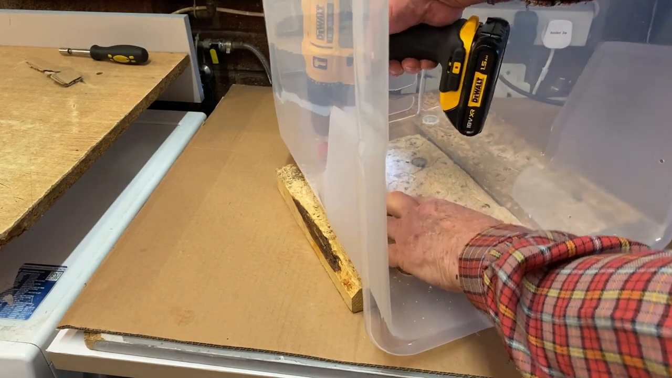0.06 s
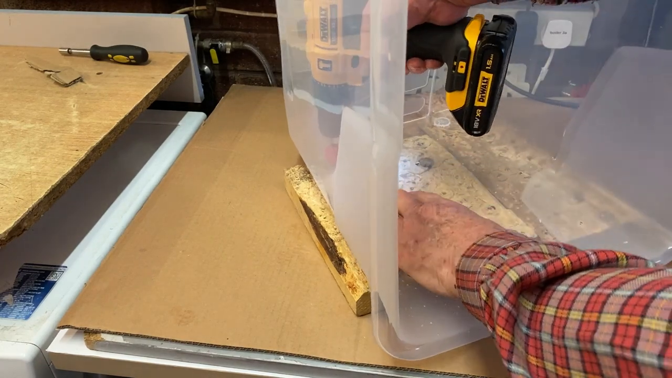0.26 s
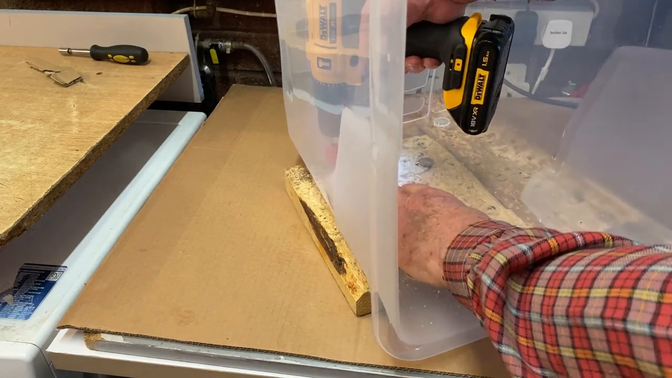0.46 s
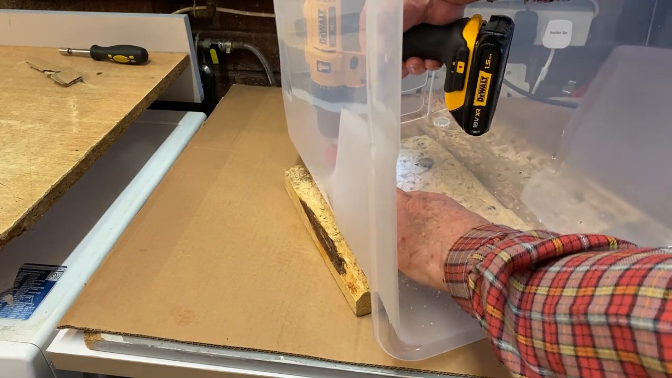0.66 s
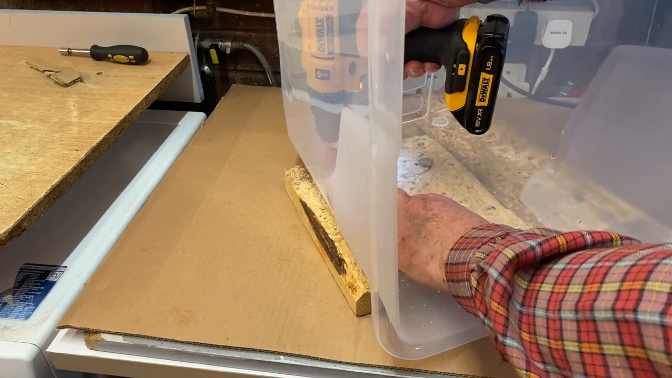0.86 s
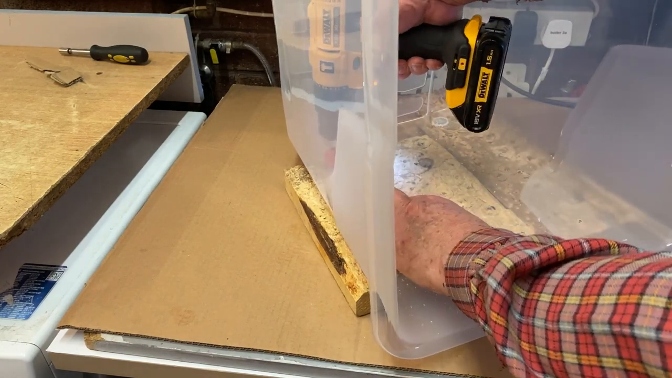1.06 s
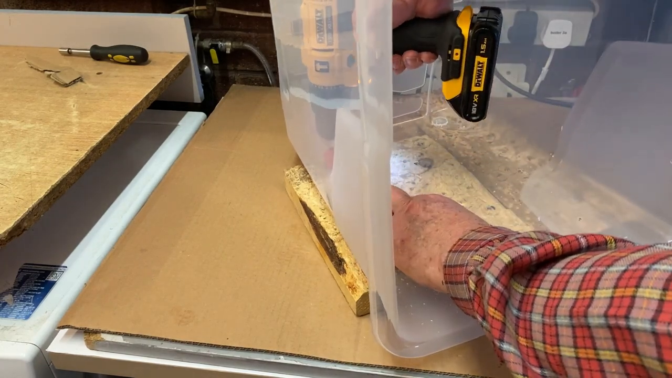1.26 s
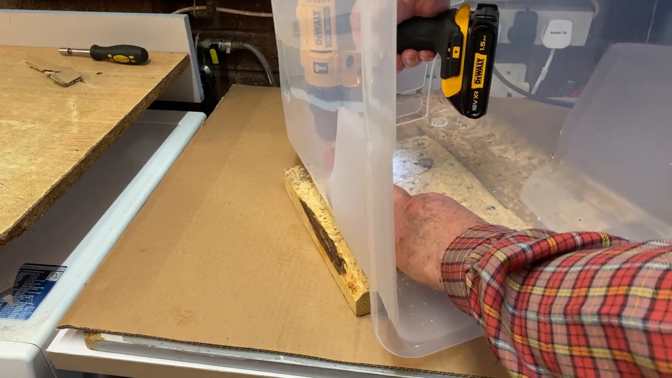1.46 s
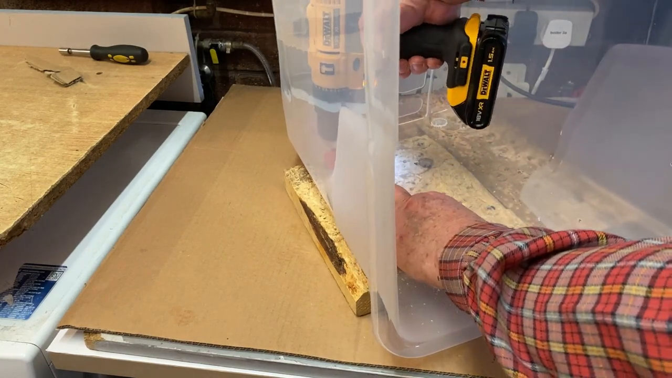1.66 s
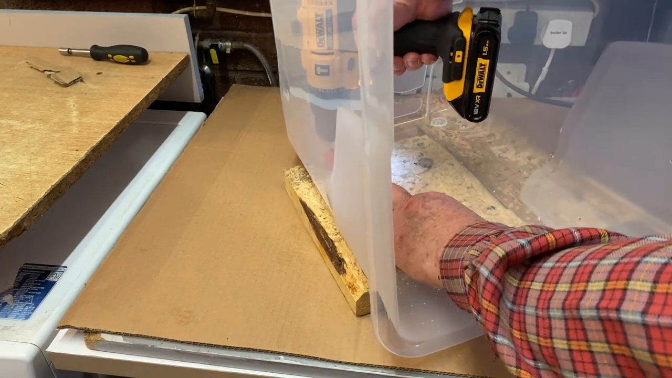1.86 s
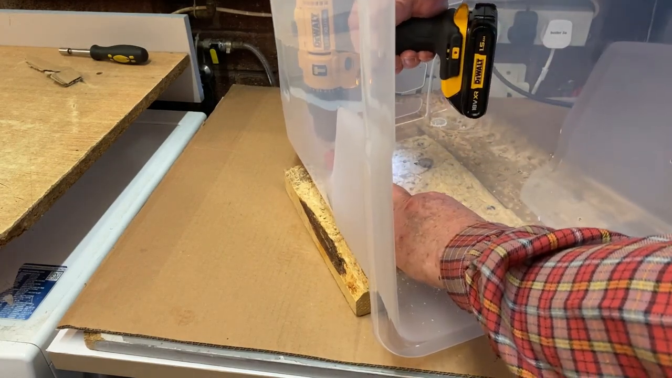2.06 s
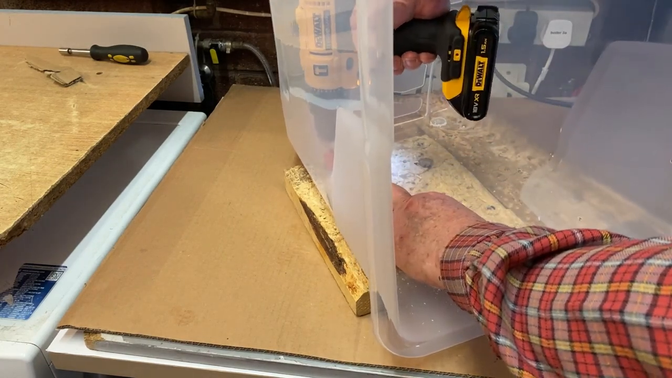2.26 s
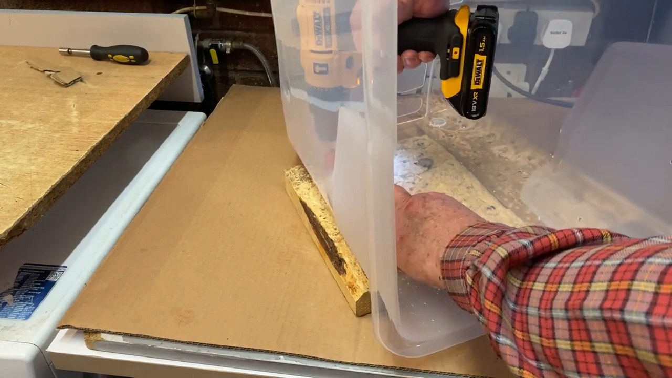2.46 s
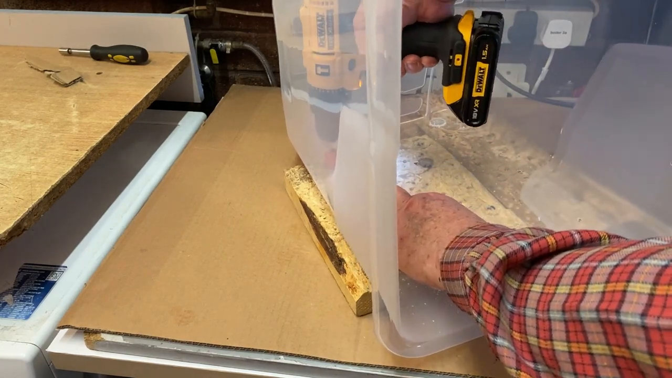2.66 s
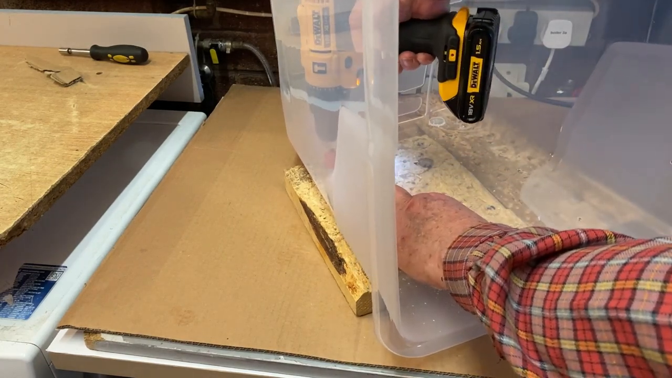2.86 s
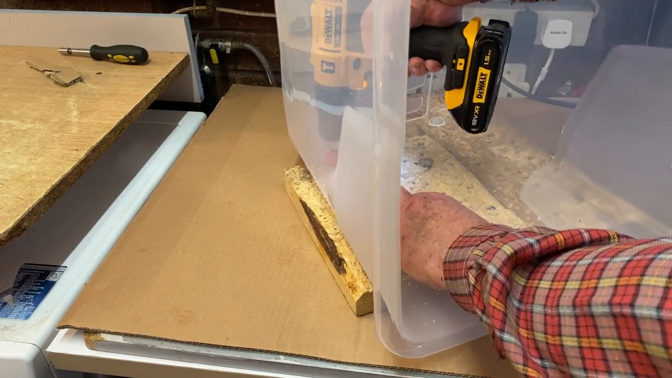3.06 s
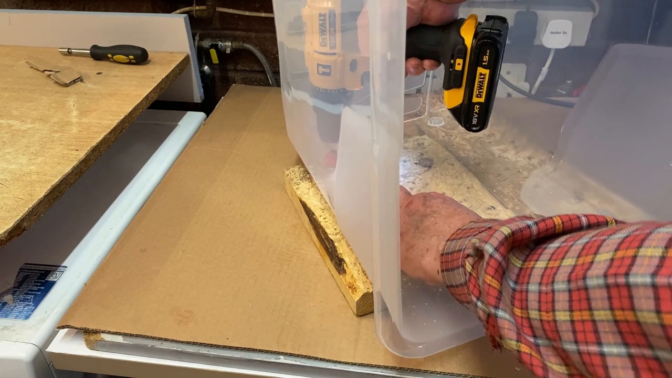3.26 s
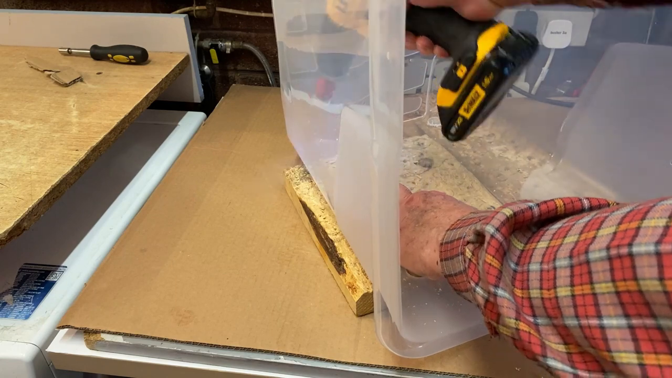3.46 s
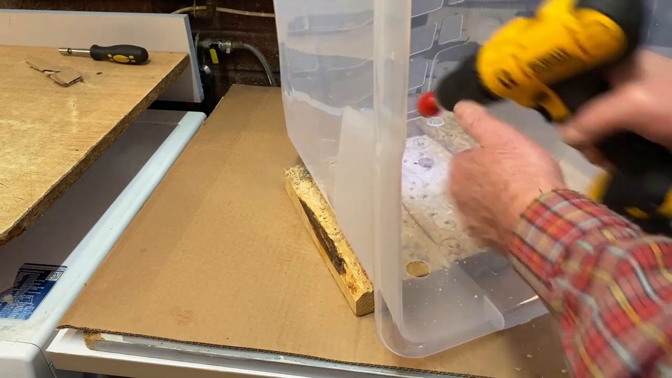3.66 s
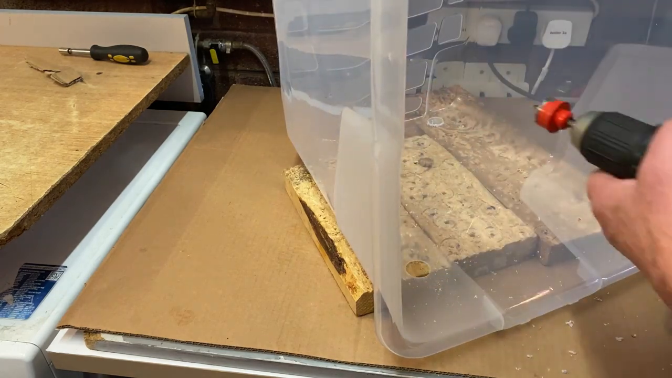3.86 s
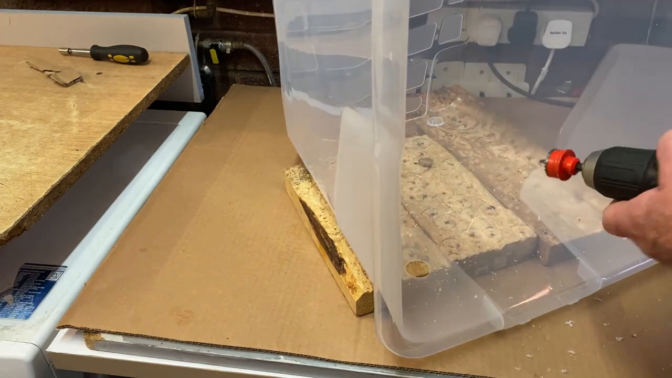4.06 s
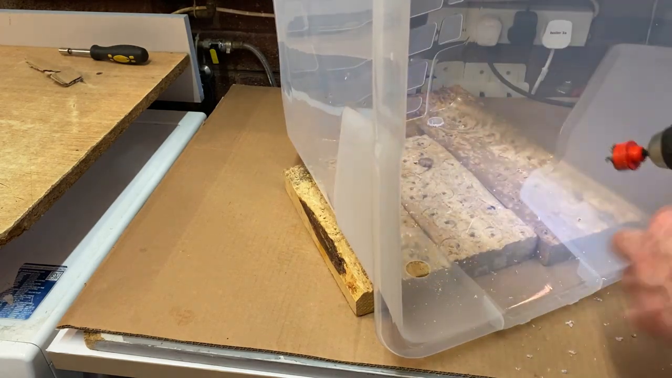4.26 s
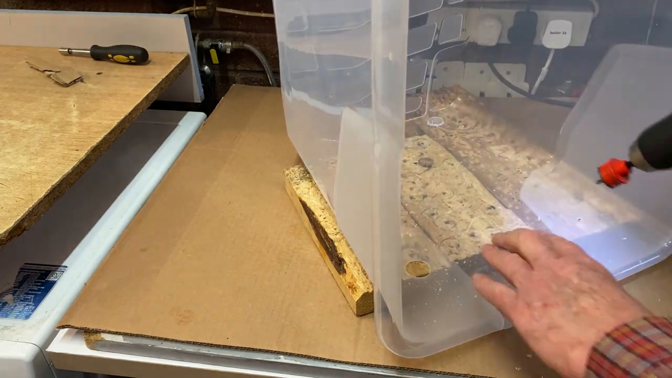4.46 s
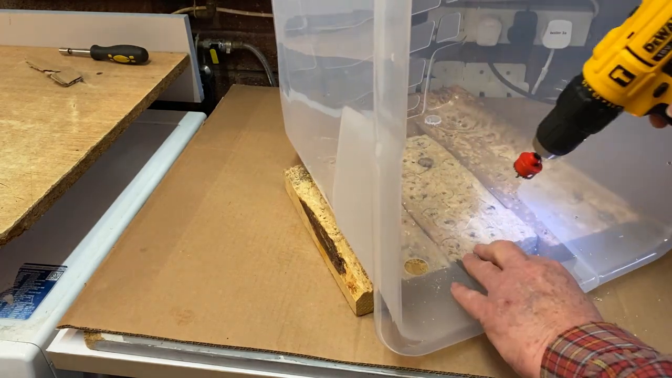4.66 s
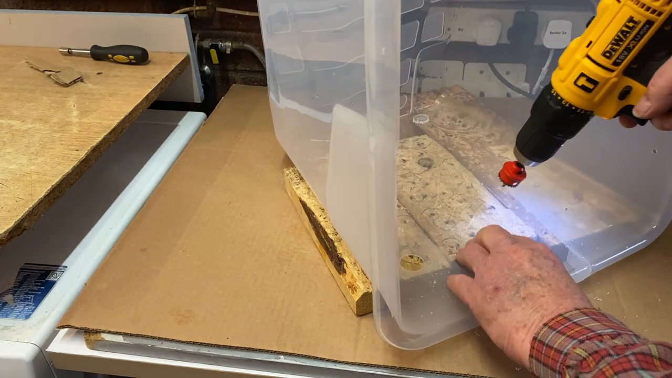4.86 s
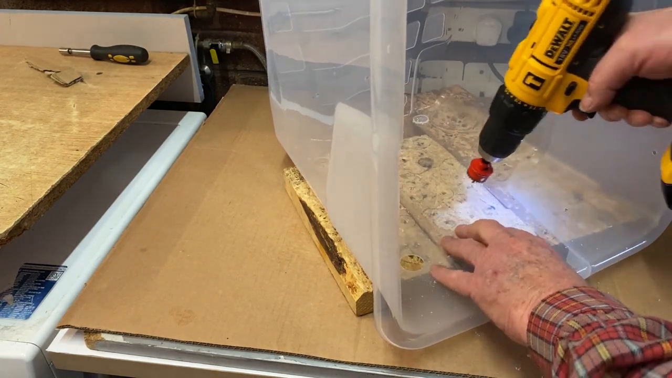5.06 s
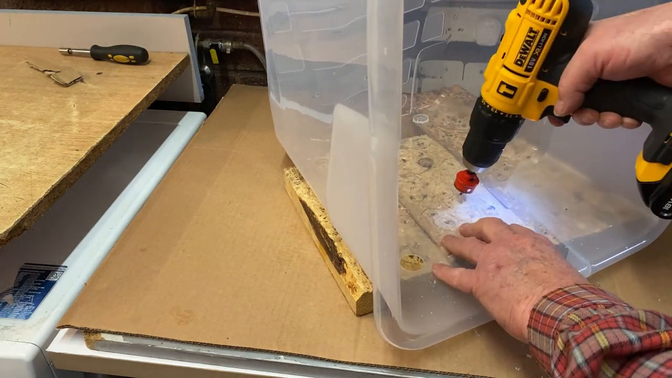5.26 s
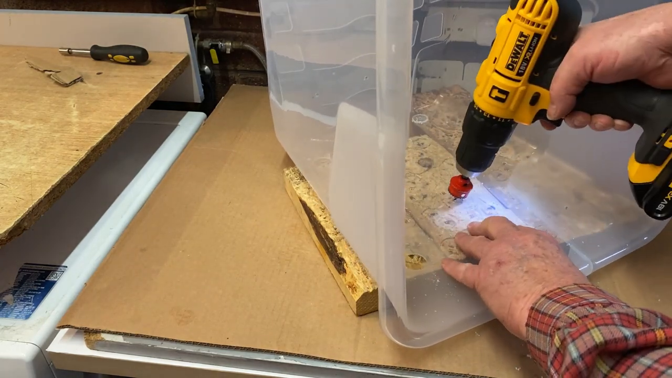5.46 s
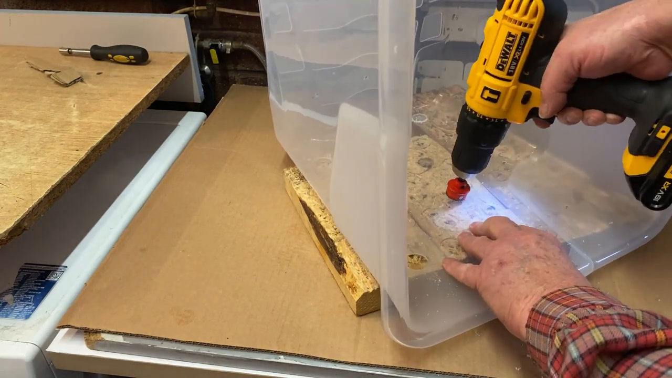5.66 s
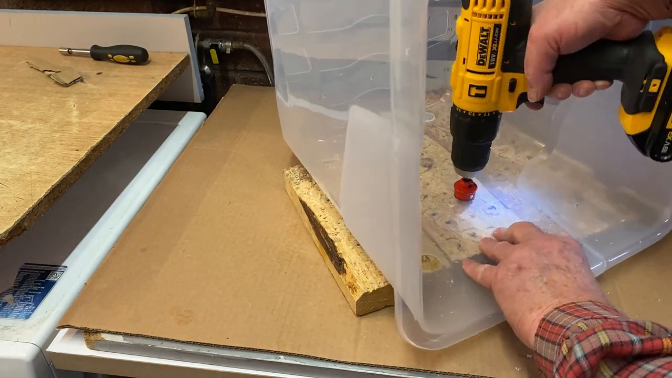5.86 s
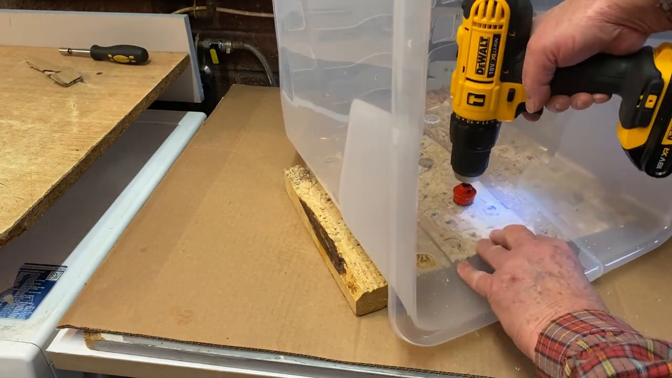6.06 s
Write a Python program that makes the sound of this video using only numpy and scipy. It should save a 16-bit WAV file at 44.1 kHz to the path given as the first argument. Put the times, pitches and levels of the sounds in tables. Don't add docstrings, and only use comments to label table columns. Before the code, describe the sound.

Hollow plastic bumps, a two-and-a-half-second burst of buzzing drill cutting, a sharp chuck stop, then light handling knocks and scuffs.

```python
import sys
import numpy as np
from scipy import signal
from scipy.fft import rfft, irfft, next_fast_len
from scipy.io import wavfile

SR = 44100
rng = np.random.default_rng(int(sys.argv[2]) if len(sys.argv) > 2 else 0)


def volts_from_db(level):
    exponent = np.asarray(level, float) / 20
    return 10 ** exponent


def wav_record(signal):
    frames = np.transpose(np.atleast_2d(signal))
    bounded = np.clip(frames, -1, 1)
    quanta = np.round(bounded * 32767).astype(np.int16)
    wavfile.write(sys.argv[1], SR, quanta)


N = 269010

TRIGGER_S, BRAKE_S = 0.812, 3.372
MODE_SPREAD_DB = 3
# start_s, level_db
FEED_PRESSURE = [(.85, -27.5), (1.02, -22.5), (1.1, -25), (1.36, -22), (1.62, -27), (1.85, -28.5),
                 (2.3, -26.5), (2.6, -25.5), (2.73, -26.5), (2.9, -23.5), (3.07, -24.5), (3.2, -26.5),
                 (3.365, -29)]
# start_s, end_s, level_db
WALL_BUZZES = [
    (1.043, 1.5, -43),
    (2.428, 2.58, -31.5),
    (2.613, 2.72, -26),
    (2.774, 3.04, -26.5),
]
WALL_LOOSE_S = WALL_BUZZES[1][0]


def rms_one(x):
    return x / np.sqrt(np.mean(x ** 2) + 1e-20)


def in_time(rows, off=None):
    s, *columns = np.transpose(rows)
    t = np.arange(N) / SR
    return np.array([np.interp(t, s, column, off, off) for column in columns])


def at_hz(points, hz):
    points = np.array(points)
    return np.interp(np.log(hz), np.log(points[:, 0]), points[:, 1])


def drift(rate_hz):
    r = np.exp(-80 * np.pi * rate_hz / SR)
    noise = rng.standard_normal(N // 40 + 2002)
    slow = signal.lfilter([1], [1, -2 * r, r * r], noise)[2000:]
    return np.interp(np.arange(N) / 40, np.arange(len(slow)), rms_one(slow))


def plateau(start_s, end_s, edge_s):
    corners = [(start_s - edge_s, 0), (start_s + edge_s, 1), (end_s - edge_s, 1), (end_s + edge_s, 0)]
    return in_time(corners, off=0)[0]


def ring(clicks, hz, t60_s):
    r, w = volts_from_db(-60 / (t60_s * SR)), 2 * np.pi * hz / SR
    return signal.lfilter([0, np.sin(w)], [1, -2 * r * np.cos(w), r * r], clicks + 1e-18)


def strike(times_s, db, contact_s, modes, spread_db):
    out = 0
    for hz, mode_db, t60_s in modes:
        push = np.zeros(N + 1000)
        gains = volts_from_db(db + mode_db + spread_db * rng.standard_normal(len(times_s)))
        for s, contact, gain in zip(times_s, contact_s, gains):
            shape = np.hanning(int(np.clip(contact * SR, 3, 900)))
            i = int(s * SR)
            push[i:i + len(shape)] += gain * shape / shape.sum()
        out = out + ring(push[:N], hz, t60_s)
    return out


def burst(times_s, db, contact_s, tail_s, low_hz, high_hz):
    envelope, age_s = np.zeros(N), np.arange(4000) / SR
    for s, level_db, rise_s in zip(times_s, db, np.maximum(contact_s, 0.0012)):
        i = int(s * SR)
        shape = (1 - np.exp(-age_s / rise_s)) * np.exp(-age_s / (rise_s + tail_s))
        envelope[i:i + 4000] += (volts_from_db(level_db) * shape)[:N - i]
    mid, side = rng.standard_normal((2, N)) * envelope
    sos = signal.butter(2, [low_hz, high_hz], "band", fs=SR, output="sos")
    return signal.sosfilt(sos, mid + 0.45 * side * [[1], [-1]])


def friction(levels_db, colour, grain_db, hold, patchy_db, throb):
    # pitch_hz, likeness
    likeness = [(100, 0.97), (330, 0.93), (700, 0.42), (1400, 0.72), (2200, 0.65), (4500, 0.7),
                (5500, 0.14), (6300, 0.51)]
    ramps = [[(200, 1), (350, 0)], [(200, 0), (350, 1), (1700, 1), (3600, 0)], [(1700, 0), (3600, 1)]]
    range_width_hz = np.array([250, 2700, 5000])
    grains = volts_from_db(grain_db * np.minimum(rng.exponential(1, N).repeat(hold)[:N], 4))
    white = rng.standard_normal((2, 2, N)) * rms_one(grains)
    together = drift(24) + throb
    edges_hz = 28 * 2 ** np.arange(0, 9.3, 0.5)
    out = 0
    for k, (low, high) in enumerate(zip(edges_hz, np.r_[edges_hz[1:], 16500])):
        sos = signal.butter(2, [low, high], "band", fs=SR, output="sos")
        mid, side = signal.sosfilt(sos, white[k % 2])
        hz = np.sqrt(low * high)
        shares = [at_hz(ramp, hz) for ramp in ramps]
        width_db = np.dot(shares, 10 * np.log10(SR / 2 / range_width_hz))
        patches_db = patchy_db * (0.5 * together + drift(2.8))
        gain = volts_from_db(np.dot(shares, levels_db) + width_db + at_hz(colour, hz) + patches_db)
        alike = np.clip(at_hz(likeness, hz), 0, 1)
        out = out + gain * (np.sqrt((1 + alike) / 2) * mid + np.sqrt((1 - alike) / 2) * side * [[1], [-1]])
    return out


def resonate(x, peaks, restless_db):
    out = x
    for hz, width_hz, db in peaks:
        r = np.exp(-np.pi * width_hz / SR)
        poles = [1, -2 * r * np.cos(2 * np.pi * hz / SR), r * r]
        peak = signal.lfilter((1 - r * r) / 2 * np.array([1, 0, -1]), poles, x)
        out = out + (volts_from_db(db + restless_db * drift(7)) - 1) * peak
    return out


def workshop(x):
    t60_s = 0.17
    age_s = np.arange(SR // 2) / SR
    bright, dull = rng.standard_normal((2, 2, len(age_s))) * (age_s > 0.004)
    dull = signal.lfilter([1, -1], [1, -1.35, 0.4], dull) * volts_from_db(-60 * age_s / t60_s)
    bright = 0.073 * bright * volts_from_db(-60 * age_s / (0.45 * t60_s))
    echo = rms_one(dull + bright) / np.sqrt(len(age_s))
    return signal.fftconvolve(x.mean(0)[None], echo, axes=1)[:, :N]


def crackle(scuff):
    snaps_per_s, level_db = 260, -7.5
    sizes = volts_from_db(4.5 * np.minimum(rng.exponential(1, N), 4)) * rng.choice([-1, 1], N)
    snaps = (rng.random(N) < snaps_per_s / SR) * sizes * scuff
    dealt = rng.integers(0, 8, N)
    pitches_hz = np.geomspace(900, 4500, 8)
    return volts_from_db(level_db) * sum(ring(snaps * (dealt == k), hz, 9 / hz) for k, hz in enumerate(pitches_hz))


def hands():
    # start_s, wobble_db, skin_sliding_db
    handling = [(0.0, -47, -50), (.35, -51.5, -59), (.68, -53, -68), (.8, -45, -66), (3.45, -50, -63),
                (3.78, -56.5, -62), (3.95, -59.5, -74.5), (4.3, -72.5, -70.5), (4.42, -71, -69),
                (4.63, -59, -78.5), (4.8, -56, -60.5), (5.4, -60.5, -65), (5.72, -48.5, -70),
                (5.82, -45.5, -73), (6.1, -38, -59.5)]
    # start_s, end_s, scuff_db, rustle_db
    strokes = [(0.25, 0.394, -54, -80), (0.528, 0.575, -58, -62), (0.707, 0.724, -53, -60.5),
               (0.772, 0.777, -47, -55), (3.817, 3.95, -63, -53.5), (3.942, 4.023, -70, -64.5),
               (4.032, 4.14, -84, -65.5), (4.145, 4.323, -75.5, -63), (4.632, 4.786, -51.5, -71),
               (4.834, 4.94, -51.5, -85), (5.088, 5.115, -57.5, -66), (5.13, 5.184, -56.5, -58),
               (5.245, 5.302, -59.5, -58), (5.348, 5.44, -81, -68.5), (5.586, 5.64, -48, -74),
               (5.849, 5.913, -52, -69), (5.899, 5.998, -37.5, -58), (5.99, 6.065, -49, -66)]
    # pitch_hz, density_db_per_hz
    rub_colour = [(30, -11), (70, 4.5), (130, -8.5), (250, 0), (600, 2.5), (1500, -7), (3000, -0.5),
                  (6000, -1), (10000, 0), (14000, -4.5)]
    # pitch_hz, width_hz, lift_db
    narrow_lifts = [(65, 7.5, 3), (99, 6.1, 8.5), (151, 9.2, 3.5), (820, 90, 1), (1128, 45, 7), (1975, 40, 8),
                    (2560, 30, 8), (3800, 200, 3)]
    room_tone_db = [
        [-68.5],
        [-77.5],
        [-89],
    ]
    cloth_db = -10
    ease = 0.22
    wobble_db, sliding_db = in_time(handling)
    bed_db = np.array([wobble_db, sliding_db, sliding_db + cloth_db])
    power = volts_from_db(1.958 * bed_db) + volts_from_db(2 * np.array(room_tone_db))
    for start, end, scuff_db, rustle_db in strokes:
        ease_s = ease * (end - start)
        corners = [(start - 0.003, 0), (start + ease_s / 2, 1), (end - ease_s, 0.85), (end + 0.012, 0)]
        shape = in_time(corners, off=0)
        power[1:] += shape ** 2 * volts_from_db(2 * np.array([[scuff_db], [rustle_db]]))
    rub = friction(10 * np.log10(power), rub_colour, grain_db=1.5, hold=60, patchy_db=0.47, throb=0)
    return resonate(rub, narrow_lifts, restless_db=2.5) + crackle(np.sqrt(power[1]))


def knocks():
    # start_s, thud_peak_db, crack_db
    taps = [(0.002, -27.5, -51), (0.144, -27, -43), (0.22, -19.5, -36), (0.721, -34.5, -60),
            (0.763, -50.5, -50), (3.675, -52, -55), (3.806, -56.5, -46), (4.161, -74.5, -67.5),
            (4.647, -40, -47), (4.661, -48.5, -47), (4.688, -37.5, -37.5), (4.859, -45.5, -51),
            (5.081, -58, -60), (5.247, -56, -73), (5.506, -47.5, -53), (5.556, -43.5, -39),
            (5.587, -28, -44.5), (5.865, -33, -50), (5.922, -29.5, -32), (5.972, -22.5, -38),
            (6.01, -29.5, -52), (6.038, -30.5, -35)]
    # start_s, thud_peak_db, crack_db
    bumps = [(0.576, -37, -60), (0.846, -11.5, -30.5), (0.861, -16.5, -18), (3.639, -42, -64),
             (4.016, -53.5, -56), (4.695, -33.5, -65), (4.786, -36.5, -54), (5.009, -48, -71),
             (5.455, -32, -45), (5.594, -23.5, -67), (5.615, -24, -63), (5.633, -17, -50),
             (5.652, -23, -46.5), (5.692, -33.5, -57.5), (5.827, -31, -57.5), (5.877, -38.5, -56),
             (5.956, -17, -42), (5.995, -27, -45), (6.026, -30, -59), (6.06, -28, -59)]
    # start_s, deep_thud_db
    heaves = [(.576, -33.5), (0.611, -40), (.717, -27.5), (.763, -41), (.846, -27), (4.66, -48.5),
              (5.651, -31.5), (5.693, -36.5), (5.956, -32), (6.009, -31.5), (6.033, -30.5)]
    # pitch_hz, level_db, t60_s
    wall_modes = [(188.3, -9, 0.059), (221, 8, .09), (247.7, 4.5, 0.14), (288, 0.5, 0.096), (314, 1.5, 0.1),
                  (430, 7, 0.044), (499, 2.5, 0.083), (554, 1, 0.061), (780, -17, 0.073)]
    # pitch_hz, level_db, t60_s
    deep_modes = [(68, -9, 0.18), (81.6, -6, 0.1), (100, 0, 0.15)]
    hard_s, soft_s = 0.0013, 0.0031
    tap_tick_db, bump_tick_db = -3, -6
    s, wall_db, crack_db = np.transpose(taps + bumps)
    by_kind = [[hard_s, soft_s], [tap_tick_db, bump_tick_db]]
    contact_s, tick_db = np.repeat(by_kind, [len(taps), len(bumps)], axis=1)
    heave_s, heave_db = np.transpose(heaves)
    thud = strike(s, wall_db - 13, contact_s, wall_modes, MODE_SPREAD_DB)
    thud = thud + strike(s, wall_db - 17.5, contact_s, deep_modes, spread_db=2.5)
    thud = thud + strike(heave_s, heave_db, 0 * heave_s + soft_s, deep_modes, spread_db=0)
    size = next_fast_len(N + SR // 4)
    hz = np.maximum(np.fft.rfftfreq(size, 1 / SR), 40)
    late = np.exp(-2j * np.pi * 1.6 * np.log(np.minimum(hz, 600) / 40))
    thud = irfft(rfft(thud, size) * late, size)[:N]
    crack = burst(s, crack_db + 11.5, contact_s / 2, 0.0049, low_hz=447, high_hz=2300)
    tick = burst(s, crack_db + tick_db - 3, contact_s / 2, 0.00089, low_hz=3000, high_hz=14020)
    return thud + crack + tick


def casing():
    # start_s, level_db
    bumps_on_rim = [
        (3.634, -50),
        (3.638, -45.5),
        (3.722, -28.5),
        (3.7248, -26),
        (3.7267, -30),
        (3.731, -36),
    ]
    # pitch_hz, level_db, t60_s
    casing_modes = [(813, -4.5, 0.05), (900, -4.5, 0.031), (1160, 1, 0.016), (1322, 0, 0.013),
                    (1770, -3.5, 0.016), (2810, -10, 0.015)]
    s, db = np.transpose(bumps_on_rim)
    return strike(s, db, 0 * s + 0.00024, casing_modes, MODE_SPREAD_DB)


def clacks():
    # start_s, peak_db, tick_db
    clack_events = [
        (3.373, -8.5, -18),
        (3.379, -23.5, -38.5),
        (3.396, -15.5, -29),
        (3.408, -24, -29),
        (3.721, -27, -36),
    ]
    # pitch_hz, level_db, t60_s
    tool_modes = [(463, -1.5, 0.027), (1160, -5, 0.0075), (1550, 2.5, 0.019), (2320, -4.5, 0.01),
                  (2850, -5, 0.006), (3500, -9, .015)]
    s, peak_db, tick_db = np.transpose(clack_events)
    contact_s = 0 * s + 0.0046
    crack = burst(s, peak_db + 13.5, contact_s / 2, 0.0013, low_hz=910, high_hz=3800)
    tick = burst(s, tick_db + 13.5, contact_s / 2, 0.00085, low_hz=3800, high_hz=15000)
    touches_s = np.r_[s, s + 0.55 * contact_s, s + 1.2 * contact_s]
    touch_db = np.tile(peak_db - 8, 3)
    return crack + tick + strike(touches_s, touch_db, 0 * touches_s, tool_modes, MODE_SPREAD_DB)


def wall_buzz_db():
    buzz = sum(volts_from_db(db) * plateau(start, end, edge_s=0.022) for start, end, db in WALL_BUZZES)
    return 20 * np.log10(buzz + volts_from_db(-59))


def motor():
    # start_s, shaft_hz
    shaft_speed = [(1.15, 386), (1.26, 384), (1.5, 377.3), (1.78, 372.7), (1.84, 367), (1.95, 373.7),
                   (2.4, 373.7), (2.46, 367.5), (2.65, 369), (2.78, 376.5), (2.9, 373), (3.05, 362.5),
                   (3.2, 375), (3.34, 380)]
    # multiple, rms_db, phase_wander_rad
    shaft_orders = [(1, -39.5, 0.077), (1.15, -57.5, .3), (2, -49, 0.29), (3.77, -40.5, 1.6),
                    (5, -43.5, 0.23), (5.3, -39, 1.8), (13.4, -38.5, 2.2), (15, -48, 2.2)]
    spin_up_s, spin_up_lag = 0.18, 0.1
    winding_order, mesh_order = 29.94, 3.0
    flutter_db = 2.6
    t = np.arange(N) / SR
    lag = spin_up_lag * np.exp(-np.maximum(t - TRIGGER_S, 0) / spin_up_s)
    turn = 2 * np.pi * np.cumsum(in_time(shaft_speed)[0] * (1 - lag)) / SR
    buzz_db = wall_buzz_db()
    whine_db = -36 - 40 * (t < 1.05)
    mesh_db = -37 + 2.2 * (in_time(FEED_PRESSURE)[0] + 25) + 3.5 * (t > WALL_LOOSE_S)
    run_db = in_time([(0.82, -19), (0.87, 0.5), (BRAKE_S, -4), (BRAKE_S + 0.015, -44.5)], off=-120)[0]
    orders = shaft_orders + [(winding_order, whine_db, 0.5), (mesh_order, mesh_db, 0.9),
                             (1.55, buzz_db, 1.3), (2 * mesh_order, buzz_db - 6, 2.2)]
    whine = 0
    for multiple, db, wander_rad in orders:
        level_db = db + run_db + flutter_db * (drift(23) + 0.68 * drift(5))
        whine = whine + np.sqrt(2) * volts_from_db(level_db) * np.sin(multiple * turn + wander_rad * drift(19))
    return whine, turn


def cutting_levels():
    rise_db_per_s, fall_db_per_s, coast_s = 900, 379.5, 0.025
    t, feed_db = np.arange(N) / SR, in_time(FEED_PRESSURE)[0]
    since_s, coasting = t - TRIGGER_S, t > BRAKE_S
    gate_db = -rise_db_per_s * np.maximum(0.03 - since_s, 0) / 2
    gate_db = gate_db - fall_db_per_s * np.maximum(t - BRAKE_S - coast_s, 0)
    shake_db = -39 + 0.74 * (feed_db + 28) + 3 * (t > WALL_LOOSE_S)
    jolt_db = -24.5 - 19 * since_s
    shake_db = np.maximum(shake_db, jolt_db)
    rasp_db = feed_db - 2.5 * coasting
    hiss_db = -21.5 - 2 * since_s - 5 * np.exp(-np.maximum(since_s, 0) / 0.13) - 15.5 * coasting
    levels_db = np.array([shake_db + 0.72 * gate_db, rasp_db + gate_db, hiss_db + gate_db])
    levels_db[1:] -= rise_db_per_s * np.maximum(-since_s, 0)
    return np.maximum(levels_db, -120)


def saw(turn):
    # pitch_hz, density_db_per_hz
    cut_colour = [(40, -23), (70, 4.5), (130, -3.5), (250, -3), (500, -0.2), (850, -2.5), (1500, -0.73),
                  (2500, 1.5), (4000, -3), (5500, -0.5), (8000, -1.5), (11000, -3), (13500, -4)]
    # pitch_hz, width_hz, lift_db
    housing = [(70, 11, -0.5), (95.9, 4.8, 7.5), (207.7, 11, 9), (421, 19, 5), (782, 21, 4), (1144, 76, 7),
               (1400, 55, 7.5), (1614, 33, 0), (1985, 50, 6), (2992, 92, 4.5), (3343, 120, 3),
               (4760, 320, 7), (5360, 110, 5.5), (7910, 140, 3.5)]
    throb = 0.6 * np.sin(turn / 13)
    rasp = friction(cutting_levels(), cut_colour, grain_db=1.5, hold=12, patchy_db=1, throb=throb)
    return volts_from_db(-1) * resonate(rasp, housing, restless_db=1.3)


def scene():
    whine, turn = motor()
    near = whine + knocks() + clacks() + casing()
    drill = saw(turn) * volts_from_db(np.array([[0.3], [-0.3]]))
    return near + drill + hands() + volts_from_db(-13) * workshop(near + 0.93 * drill)


def roll_off(x):
    return signal.sosfilt(signal.butter(12, 16850, fs=SR, output="sos"), x)


def record(dry):
    cutoff_hz, port_from_hz, port_turn_hz = 15900, 7000, 4120
    ceiling = 1.1
    size = next_fast_len(N + 256)
    hz = np.fft.rfftfreq(size, 1 / SR)
    left, right = rfft(dry, size) * np.clip((cutoff_hz - hz) / 200, 0, 1) * np.clip(hz / 50, 0, 1) ** 3.5
    mid = (left + right) / 2
    side = (left - right) / 2 * np.clip((6600 - hz) / 500, 0.06, 1) * np.clip(hz / 300, 0.45, 1)
    twist = np.exp(1j * np.pi * np.clip(hz - port_from_hz, 0, 2 * port_turn_hz) / port_turn_hz)
    pair = irfft(np.array([(mid + side) / twist, (mid - side) * twist]), size)[:, :N]
    mix = ceiling * np.tanh(pair / ceiling)
    return roll_off(mix)


dry = scene()
out = record(dry)
wav_record(out)
```